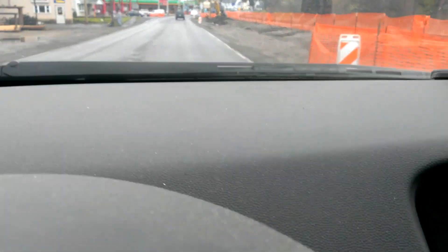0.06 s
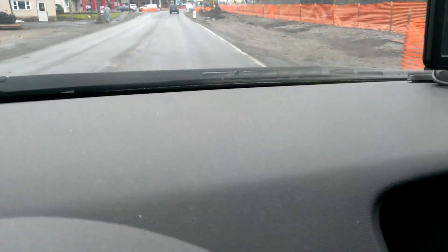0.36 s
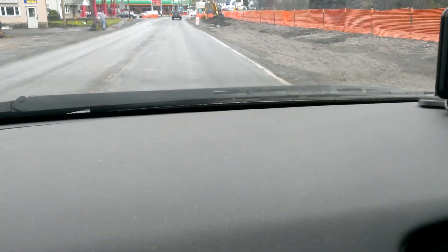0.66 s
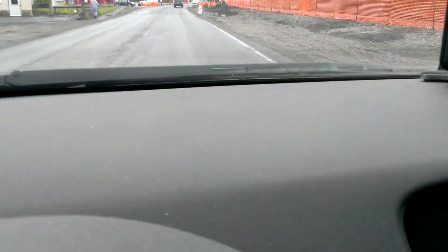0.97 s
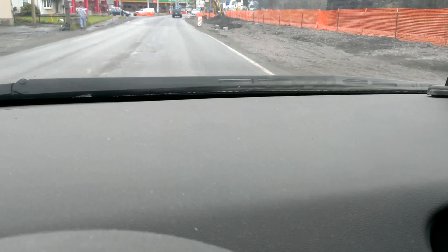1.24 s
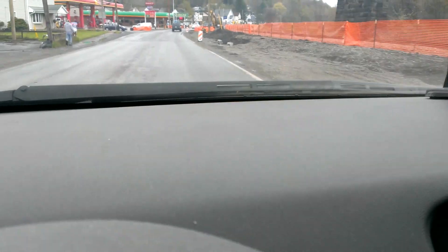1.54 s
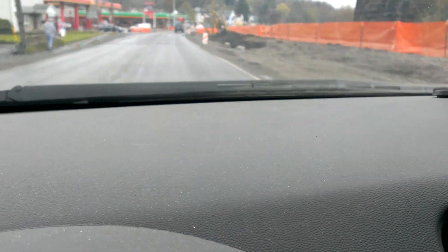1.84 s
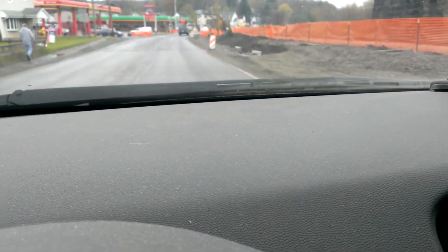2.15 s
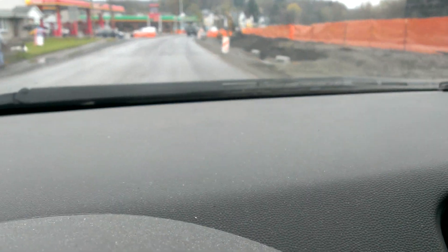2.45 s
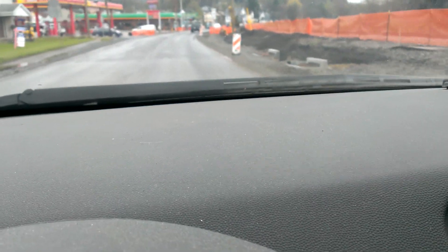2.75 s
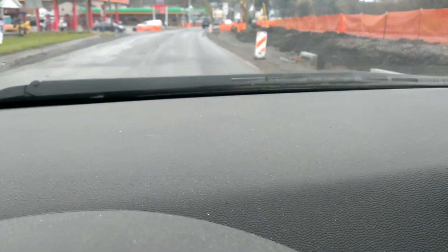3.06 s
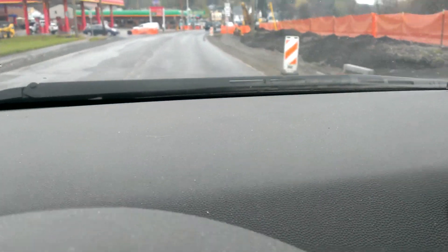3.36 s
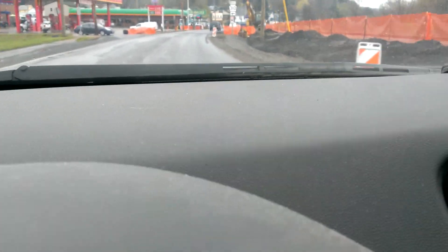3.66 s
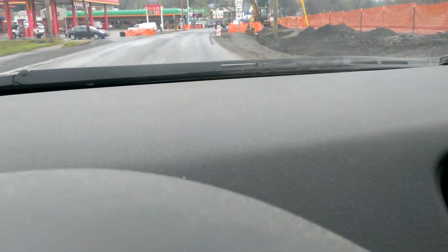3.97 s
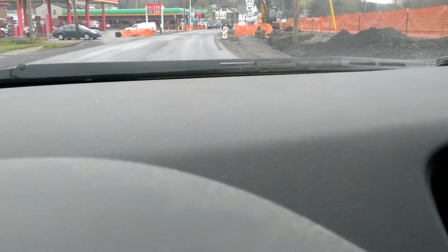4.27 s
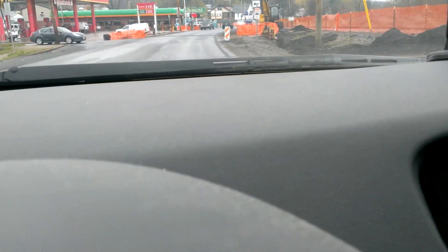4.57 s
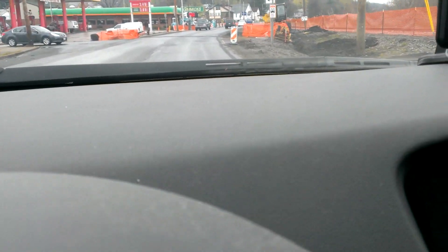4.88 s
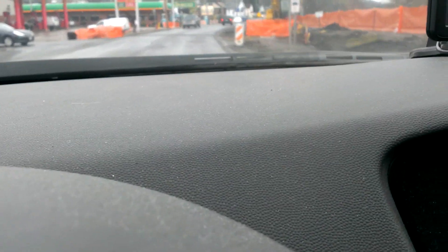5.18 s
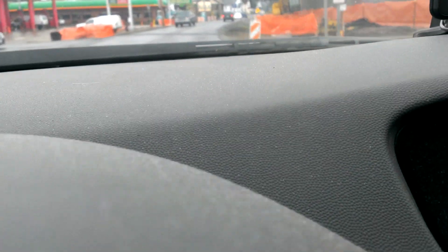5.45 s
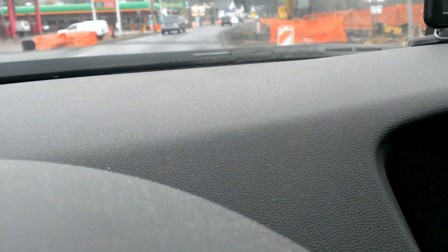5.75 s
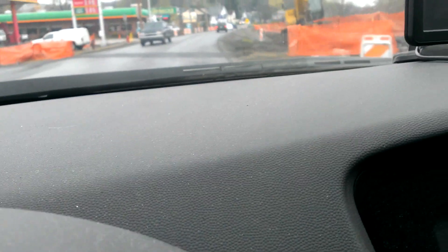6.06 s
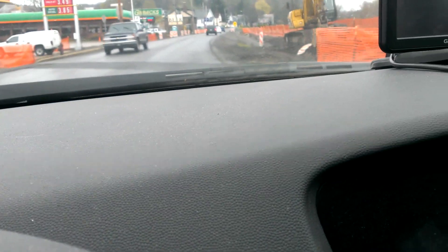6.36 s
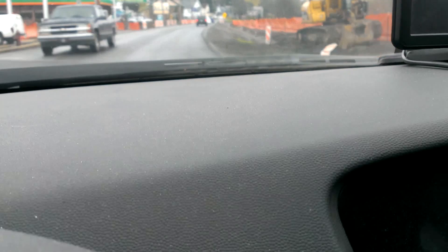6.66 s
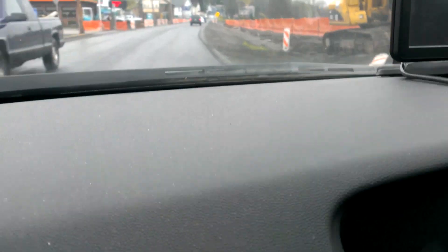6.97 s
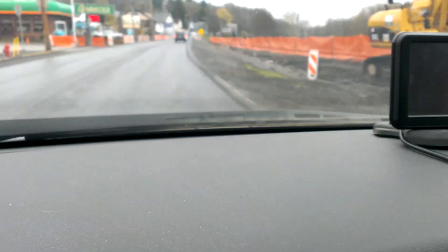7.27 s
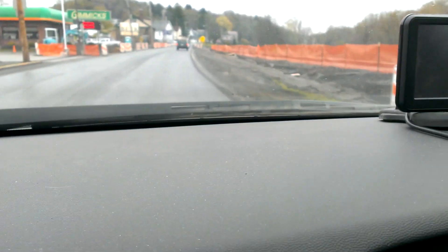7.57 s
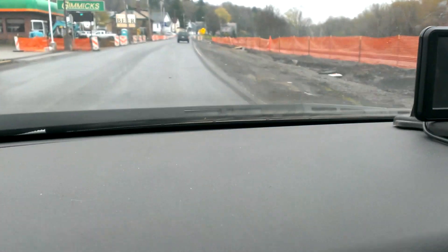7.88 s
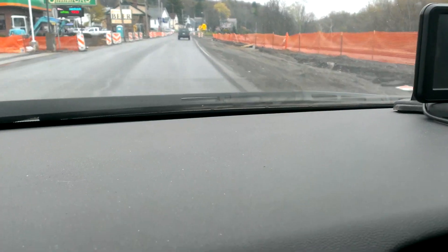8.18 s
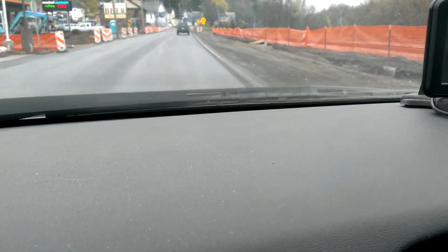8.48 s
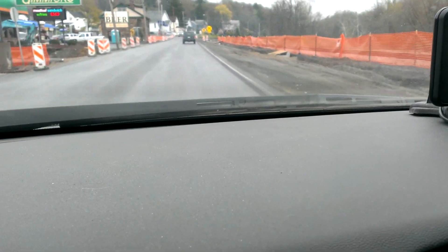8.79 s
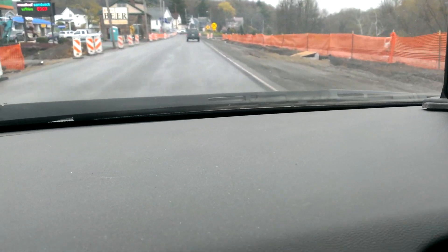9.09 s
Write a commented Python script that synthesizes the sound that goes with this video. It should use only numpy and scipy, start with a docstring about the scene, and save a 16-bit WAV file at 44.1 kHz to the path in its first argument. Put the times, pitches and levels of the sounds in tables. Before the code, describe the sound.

Throughout, a car is heard from the front passenger seat at a steady speed: a deep body rumble, a wavering tyre drone and hum, a soft engine tone and a faint hiss from the damp road. From about 0.8 to 1.1 seconds the front wheels hit broken pavement, giving suspension knocks, a low boom and a short rattle of plastic dashboard trim. The drive continues with light tyre slaps over road seams, occasional faint ticks and soft jolts near 2.3 and 4.3 seconds. From about 7.2 to 7.8 seconds comes the loudest event: a quick cluster of hard suspension knocks, then heavy body booms and shuddering, with trim rattling and buzzing and wet grit crackling against the wheel arch. The rattles die away by about 8.2 seconds, leaving the steady rumble and tyre noise until the end, just past 9 seconds.

```python
"""Car cabin on a damp, rough road

Tyres drone through the body and hum at multiples of the wheel rate, over a soft engine tone.
Twice the front wheels hit broken pavement: the suspension knocks, the body booms and the
dashboard trim rattles. The second time, wet grit sprays into the wheel arch."""
import sys
import numpy as np
from scipy import signal
from scipy.fft import rfft, irfft, next_fast_len
from scipy.io import wavfile
from scipy.ndimage import uniform_filter1d, minimum_filter1d

SR = 44100
rng = np.random.default_rng(int(sys.argv[2]) if len(sys.argv) > 2 else 0)


def master(y):
    """Save y as 16-bit WAV."""
    cut = np.clip(np.atleast_2d(y).T, -1, 1)
    pcm = np.round(cut * 32767)  # scale
    wavfile.write(sys.argv[1], SR, pcm.astype(np.int16))


N = 411453
TIME_S = np.arange(N) / SR


def from_db(db):
    """Decibels to gain."""
    return np.exp(np.asarray(db) * (np.log(10) / 20))


def unit_rms(x):
    """Scale to unit power."""
    return x / np.sqrt(np.mean(x ** 2) + 1e-20)


def in_time(rows):
    """Each value column of a time curve, at every sample."""
    time_s, *columns = np.transpose(rows)
    return [np.interp(TIME_S, time_s, column) for column in columns]


def at_hz(points, hz):
    """Interpolate a table along log frequency."""
    known_hz, values = np.transpose(points)
    return np.interp(np.log(hz + 1e-9), np.log(known_hz), values)


def drift(rate_per_s, step=1):
    """Smooth random curve, rms 1, at every step-th sample."""
    knots = rng.standard_normal(1000)
    place = np.arange(0, N, step) * (rate_per_s / SR)
    return unit_rms(np.interp(place, np.arange(len(knots)), knots))


def add(track, start_s, sound):
    """Mix a sound into a track."""
    start = round(start_s * SR)
    track[..., start:start + sound.shape[-1]] += sound[..., :N - start]


def swell(t, rise_s):
    """Envelope that peaks at 1 after rise_s, then decays."""
    age = np.maximum(t, 0) / rise_s
    return age * np.exp(1 - age)


def swells(rows):
    """Sum of timed swells."""
    out = np.zeros(N)
    for start_s, height, rise_s in rows:
        add(out, start_s, height * swell(TIME_S[:SR // 4], rise_s))
    return out


def ramp_db(full_s, end_s, attack_db_per_s, release_db_per_s, build_db_per_s=0):
    """Attack until full_s, build to 0 dB at end_s, then release."""
    onset_db = attack_db_per_s * np.maximum(full_s - TIME_S, 0)
    below_peak_db = np.maximum(build_db_per_s * (end_s - TIME_S), release_db_per_s * (TIME_S - end_s))
    return np.maximum(-onset_db - below_peak_db, -200)


def bend(sound, ratio):
    """Shift pitch by a changing ratio."""
    place = np.cumsum(ratio) % (N - 1)
    return np.array([np.interp(place, np.arange(N), channel) for channel in sound])


# Left-right likeness: freq_hz, correlation
CORRELATION = [(60, .995), (110, .99), (135, .975), (280, .955), (550, .92), (1000, .68), (2000, .36),
               (4000, .66), (6000, .55), (9000, .85)]


def widen(mid, side, hz):
    """Left and right spectra: alike in the bass, more diffuse in the treble."""
    alike = np.clip(at_hz(CORRELATION, hz), 0, 1)
    return np.sqrt(1 + alike) * mid + np.sqrt(1 - alike) * side * [[1], [-1]]


# Stereo balance: freq_hz, left_minus_right_db
CABIN_BALANCE = [(60, -0.5), (250, 1), (600, 0), (1100, -1), (1900, -6.5), (3300, -4.5), (5900, -4.5),
                 (10000, 1)]
# Windscreen, side glass and roof reflections: delay_s, gain
REFLECTIONS = [(.00208, 0.05), (.0052, 0.06), (.0083, -.15), (.0127, 0.067)]


def cabin_noise(spectrum, grain_db=0, reflect=False):
    """Coloured stereo noise, rms 1; grain_db makes it a stream of unequal impacts."""
    size = next_fast_len(N, real=True)
    top_hz = min(2 * spectrum[-1][0], SR / 2)
    hz = np.arange(int(top_hz * size / SR)) * SR / size
    if grain_db:
        noise = rng.standard_normal((2, size))
        white = rfft(noise * from_db(grain_db * np.minimum(rng.exponential(1, size), 6)))
    else:
        noise = rng.standard_normal((2, size), dtype=np.float32)
        white = noise[:, :size // 2 * 2].view(np.complex64)
    pan_db = at_hz(CABIN_BALANCE, hz) * [[.5], [-.5]]
    gain = from_db(at_hz(spectrum + [(top_hz + 1, -80)], hz) + pan_db)
    if reflect:
        echoes = sum(echo * np.exp(-2j * np.pi * hz * delay_s) for delay_s, echo in REFLECTIONS)
        gain = gain * np.abs(1 + echoes)
    shaped = widen(*white[:, :len(hz)], hz) * gain
    return unit_rms(irfft(shaped.astype(np.complex64), size)[:, :N])


def strike(blows, modes, detune, vary_db=2, damping=1):
    """Each blow rings all modes with random strength and detuning; damping narrows the envelope."""
    t, out = TIME_S[:SR // 4], np.zeros(N)
    hz, mode_db, rise_s = np.transpose(modes)[..., None]
    for start_s, db, tilt_db_per_oct, pitch_ratio, length_ratio in blows:
        force, load = rng.standard_normal((2, len(modes), 1))
        gain = from_db(db + mode_db + vary_db * force + tilt_db_per_oct * np.log2(hz / hz[0]))
        envelope = swell(t, rise_s * length_ratio) ** damping
        tones = np.sin(2 * np.pi * hz * pitch_ratio * (1 + detune * load) * t)
        add(out, start_s, np.sum(gain * envelope * tones, axis=0))
    return out


# Microphone hiss: time_s, level_db
MIC_HISS_CURVE = [(0.1, -63), (0.2, -67.5), (0.7, -65.5), (2.1, -67), (3.0, -62), (4.0, -65.5), (5.7, -67),
                  (9.33, -62.5)]


def mic_hiss(texture):
    """Faint white microphone hiss, wavering slightly."""
    hiss_db = in_time(MIC_HISS_CURVE)[0] + 1.2 * texture + 1.2 * drift(14)
    return from_db(hiss_db) * rng.standard_normal(N)


# Engine tone: time_s, firing_hz, level_db
ENGINE_CURVE = [(0, 86.7, -28.5), (1.2, 87.5, -33.5), (2.2, 95.4, -36), (2.9, 97.54, -31.5), (3.6, 95, -35),
                (4.5, 86.18, -35), (5.8, 87.4, -27.5), (6.4, 87.44, -55.5), (9.33, 82, -42)]


def engine():
    """Soft firing tone that rises a little under load."""
    firing_hz, db = in_time(ENGINE_CURVE)
    phase = 2 * np.pi * np.cumsum(firing_hz) / SR + 0.49 * drift(4.4)
    return np.sqrt(2) * from_db(db) * np.sin(phase)


# Road roughness: time_s, level_db
RUMBLE_CURVE = [(0.0, -25.5), (0.4, -24.5), (3.6, -27), (3.9, -28.5), (4.1, -22.5), (4.6, -25.5),
                (5.7, -25.5), (6.5, -27.5), (7.3, -23), (8.0, -26), (8.7, -27.5), (9.33, -25)]
# Body rumble: freq_hz, density_db
RUMBLE_SPECTRUM = [(15, -31), (30, -24), (42, -6.5), (50, -3), (70, -5), (90, -7), (112, -13.5),
                   (128, -5.5), (150, -13), (200, -10), (232, -17.5), (300, -42.5)]


def road_rumble():
    """The rough surface shakes the body."""
    return from_db(in_time(RUMBLE_CURVE)[0] + 0.62 * drift(9.1)) * cabin_noise(RUMBLE_SPECTRUM)


# Tyre cavity drone: time_s, level_db
CAVITY_CURVE = [(0.0, -30), (0.2, -36.5), (0.4, -30), (0.8, -41), (2.1, -30), (2.3, -36), (2.7, -33),
                (3.5, -30), (4.3, -33.5), (4.9, -31.5), (5.1, -33), (7.0, -30), (8.1, -40), (8.3, -31.5),
                (8.8, -35.5), (9.0, -34), (9.33, -32.5)]
# Tyre cavity resonance: freq_hz, density_db
CAVITY_SPECTRUM = [(200, -32), (240, -10), (262, -9.5), (277, 1), (300, -5.5), (340, -9.5), (370, -15.5),
                   (397, -10.5), (440, -24.5), (600, -39)]


def tyre_drone():
    """The road rings the air inside the tyres."""
    return from_db(in_time(CAVITY_CURVE)[0] + 1.38 * drift(14)) * cabin_noise(CAVITY_SPECTRUM)


# Road seams: start_s, roar_boost_db, rise_s
ROAD_SEAMS = [(.375, 6.5, 0.003), (.47, 9.5, 0.016), (1.409, 8, 0.003), (3.423, 9.5, 0.0037),
              (3.835, 6.5, 0.017), (3.935, 1, 0.017), (4.375, 2, 0.02), (4.928, 0, 0.0018),
              (5.085, 7.5, 0.0091), (6.01, 5.5, 0.035), (6.19, 3, 0.01), (6.46, 4.5, 0.013),
              (6.84, 5, 0.015), (7.239, 13, 0.006)]


def seam_slap_db():
    """Brief level boosts as the tread slaps over seams."""
    return swells(ROAD_SEAMS)


# Road wetness: time_s, level_db
WET_CURVE = [(0.0, -49), (0.2, -63), (0.4, -57.5), (3.5, -54), (3.8, -53), (5.0, -58), (5.2, -55),
             (7.9, -54.5), (9.33, -54.5)]
# Wet hiss: freq_hz, density_db
WET_SPECTRUM = [(1000, -27), (1500, 3), (1900, 0.5), (2450, -2.5), (2850, -1.5), (3300, -8.5),
                (4000, -12.5), (5000, -26), (8000, -23)]
# Singing band: time_s, centre_hz, level_db
SINGING_CURVE = [(0, 2840, -73), (2.4, 2880, -71), (3.35, 2970, -69), (3.7, 2973, -59.5), (4.3, 2794, -64),
                 (4.9, 2840, -66), (5.3, 2803, -64), (6.1, 2743, -63), (6.33, 2402, -68),
                 (6.55, 2074, -59.5), (7, 1980, -60), (8.3, 2012, -66.5), (9.33, 2000, -61)]
# Singing band before the pitch shift: freq_hz, density_db
SINGING_SPECTRUM = [(2200, -26), (2750, -7), (3000, 0), (3220, -7), (3800, -26)]


def wet_hiss(texture, slap_db):
    """Damp road hisses under the tread; a narrow band sings within it and shifts in pitch."""
    hiss_db = in_time(WET_CURVE)[0] + 1.2 * texture + 1.8 * drift(60) + 0.18 * slap_db
    hiss = from_db(hiss_db) * cabin_noise(WET_SPECTRUM, grain_db=3.5, reflect=True)
    centre_hz, singing_db = in_time(SINGING_CURVE)
    peak_hz = SINGING_SPECTRUM[2][0]
    band = bend(cabin_noise(SINGING_SPECTRUM), centre_hz / peak_hz)
    return hiss + from_db(singing_db + 2.3 * drift(22)) * band


# Wheel speed: time_s, turns_per_s
WHEEL_RATE = [(0, 13.22), (1.6, 13.55), (2.6, 13.78), (3.9, 14.2), (4.7, 14.37), (5.6, 14.48), (6.8, 14.47),
              (8.2, 13.8), (9.33, 13.55)]


def wheel_turns(step=1):
    """Running count of wheel turns, at every step-th sample."""
    return np.cumsum(in_time(WHEEL_RATE)[0][::step]) * step / SR


# Asphalt coarseness: time_s, level_db
ROAR_CURVE = [(0.0, -44.5), (3.3, -44), (3.6, -41.5), (4.6, -42.5), (5.6, -41), (6.5, -42), (7.1, -44),
              (8.8, -46), (9.33, -42)]
# Tread roar: freq_hz, density_db
ROAR_SPECTRUM = [(330, -28.5), (450, 0.5), (560, 0), (660, -3.5), (790, -3.5), (970, -6), (1080, -8),
                 (1170, -9.5), (1450, -16), (2200, -35.5)]
# Groove resonance: freq_hz, density_db
GROOVE_SPECTRUM = [(780, -24), (905, -5), (985, 0), (1040, -3), (1095, -13), (1200, -30)]


def tread_roar(texture, slap_db):
    """Tread roars on asphalt, throbbing once a turn; its grooves ring in a fluttering band."""
    throb_db = 1.14 * np.cos(2 * np.pi * wheel_turns())
    roar_db = in_time(ROAR_CURVE)[0] + 1.6 * texture + throb_db + slap_db
    roar = from_db(roar_db) * cabin_noise(ROAR_SPECTRUM, reflect=True)
    flutter_db = 3.2 * np.minimum(drift(42), 1) + 1.2 * drift(8)
    grooves = bend(cabin_noise(GROOVE_SPECTRUM), 1 + .035 * drift(8))
    return roar + from_db(roar_db - 6 + flutter_db) * grooves


# Wheel-rate harmonics: order, level_db
HUM_ORDERS = [(4, -37), (9, -45), (10, -42.5), (11, -42.5), (12, -40.5), (13, -40.5), (14, -40.5),
              (19, -43), (20, -42.5), (21, -45), (22, -45.5)]
# Swells of single harmonics: centre_s, half_width_s, order, boost_db
ORDER_SWELLS = [(0, .3, 10, 11), (.42, .2, 21, 13), (1.65, .45, 10, 13), (1.7, .4, 9, 7), (2.7, .4, 13, 12),
                (2.9, .3, 21, 8), (2.95, .45, 20, 13), (3.0, .75, 10, 15), (3.35, .5, 9, 8),
                (3.9, .5, 13, 9), (4.0, .25, 12, 8), (4.7, .35, 12, 11), (4.9, .33, 19, 11),
                (5.4, .6, 9, 11), (5.4, .5, 11, 7), (5.6, .55, 14, 9), (5.9, .3, 19, 8), (6.0, .6, 13, 7),
                (6.4, .35, 12, 10), (6.5, .5, 11, 6), (6.65, .22, 19, 12), (6.68, .22, 14, 15),
                (7.9, .3, 4, 11), (8.0, .35, 13, 8), (8.3, .35, 10, 14), (8.6, .45, 19, 8),
                (8.7, .3, 12, 7), (8.8, .25, 13, 11)]


def tyre_hum(wobble_turns=.009, spread_rad=.16):
    """Tyre unevenness repeats every turn, giving harmonics that swell and fade."""
    step = 20
    t, hum = TIME_S[::step], 0
    turns = wheel_turns(step) + wobble_turns * drift(5, step)
    for order, db in HUM_ORDERS:
        offset_cycles, skew = rng.uniform(-1.036, 1, 2)
        lift_db = sum(boost_db * np.exp(-((t - centre_s) / half_width_s) ** 2)
                      for centre_s, half_width_s, boosted, boost_db in ORDER_SWELLS if boosted == order)
        phase = 2 * np.pi * (order * turns + offset_cycles) + spread_rad * skew * np.array([[1], [-1]])
        hum = hum + np.sqrt(2) * from_db(db + lift_db + 2.1 * drift(7, step)) * np.sin(phase)
    return signal.resample_poly(hum, step, 1, axis=1, window=("kaiser", 10))[:, :N]


# Dashboard resonances: freq_hz, width_hz, gain_db
PANEL_MODES = [(2250, 580, 8.5), (3500, 140, -1.5), (4600, 260, 0.5), (8950, 440, -2)]


def chatter(db, ring_hz, width_oct, rise_s, pan_db=-3, size=4096):
    """One burst of uneven plastic contacts, coloured by the part and the dashboard."""
    hz = np.arange(1, size // 2 + 2) * SR / size
    panel = 1 + sum(from_db(mode_db) / (1 + (2 * (hz - mode_hz) / width_hz) ** 2)
                    for mode_hz, width_hz, mode_db in PANEL_MODES)
    resonance = panel / (1 + (np.log2(hz / ring_hz) / width_oct) ** 2)
    strengths = from_db(1.5 * rng.standard_normal(size // 20))
    contacts = np.repeat(strengths, SR // 1000)[:size] * rng.standard_normal((2, size))
    buzz = unit_rms(irfft(widen(*rfft(contacts), hz) * resonance, size))
    return buzz * swell(TIME_S[:size], rise_s) * from_db(db + pan_db * np.array([[.5], [-.5]]))


# Soft rustles: start_s, level_db, centre_hz, width_oct
CABIN_RUSTLES = [(1.18, -56.5, 4200, 1), (1.24, -58, 2500, 0.71), (2.74, -57, 3570, 0.21),
                 (3.001, -63, 4400, 0.33), (3.05, -58, 5760, .07), (3.09, -53.5, 3120, 0.12),
                 (3.63, -56.5, 5130, 1), (4.369, -57, 2850, .1)]


def rustles():
    """Soft, slow-rising rustles in the cabin."""
    out = np.zeros((2, N))
    for start_s, db, centre_hz, width_oct in CABIN_RUSTLES:
        add(out, start_s, chatter(db, centre_hz, width_oct, rise_s=.033, size=16384))
    return out


# Plastic ticks, plus a sharp scuff of grit in the spray: start_s, level_db, ring_hz, left_minus_right_db,
# width_oct
PLASTIC_TICKS = [(.010, -54.5, 9100, 0, .04), (0.776, -45.5, 4670, -2, .07), (.777, -48, 2400, 2, 0.22),
                 (0.904, -33, 846, -3, 0.16), (0.971, -28.5, 1050, 0, 0.18), (1.015, -40, 2250, -9, .2),
                 (1.606, -52, 3800, 9, 0.28), (2.353, -50, 9700, -2, .2), (4.142, -48.5, 3800, 7, 0.35),
                 (7.382, -41, 4470, -3, 0.18), (7.452, -27, 895, -1, .2), (7.749, -36, 4300, -2, 0.27),
                 (8.195, -47, 8700, -3, .35), (8.214, -43, 8100, -5, .33), (9.243, -44.5, 4830, -7, .15),
                 (9.243, -46, 2530, -7, .15)]


def plastic_ticks(rise_s=.0024, stray_per_s=2, stray_db=-67, low_hz=2500, high_hz=4500):
    """Plastic parts tick sharply, grit scuffs once, and faint strays tick at random times."""
    out = np.zeros((2, N))
    for start_s, db, ring_hz, pan_db, width_oct in PLASTIC_TICKS:
        add(out, start_s, chatter(db, ring_hz, width_oct, rise_s, pan_db))
    for when, pitch in rng.random((round(stray_per_s * N / SR), 2)):
        ring_hz = low_hz * (high_hz / low_hz) ** pitch
        add(out, when * TIME_S[-1], chatter(stray_db, ring_hz, width_oct=.35, rise_s=rise_s))
    return out


# Loose part modes: ring_hz, level_db, loss_per_bounce_db
PART_MODES = [(3470, -54, 1.3), (8930, -62, 2.2)]


def bouncing_part(start_s=1.169, interval_s=.057, jitter_s=.004, bounces=5):
    """A loose part bounces to rest after the first broken patch."""
    out = np.zeros((2, N))
    for k, late_s in enumerate(jitter_s * rng.standard_normal(bounces)):
        for ring_hz, db, loss_db in PART_MODES:
            contact = chatter(db - k * loss_db, ring_hz, width_oct=.07, rise_s=.004)
            add(out, start_s + k * interval_s + late_s, contact)
    return out


# Trim snaps and rattles, plus a scuff of grit as the spray begins: start_s, level_db, ring_hz, rise_s
TRIM_RATTLES = [(0.776, -42.5, 3200, 0.0031), (0.785, -52, 3200, 0.0084), (0.953, -50, 4000, 0.0064),
                (.970, -45, 3000, 0.0073), (0.983, -39, 2600, 0.0054), (1.008, -50, 3200, 0.0044),
                (1.110, -45.5, 3900, 0.0088), (2.284, -48.5, 1900, .009), (2.308, -45, 5000, 0.00094),
                (2.316, -49.5, 3000, .007), (2.347, -47, 5000, 0.0093), (2.36, -42.5, 2700, 0.0021),
                (2.384, -54, 4500, .011), (4.395, -56, 3200, .007), (4.457, -54.5, 3300, .006),
                (7.222, -51, 4200, .008), (7.315, -44, 3800, 0.0041), (7.379, -46, 3900, 0.0099),
                (7.452, -51, 3600, .005), (7.504, -36, 2200, 0.0049), (7.530, -36, 3200, .003),
                (7.634, -36, 3800, 0.012), (7.742, -35, 2390, 0.0071), (7.849, -48, 3600, 0.0037),
                (7.89, -53, 4150, 0.0077), (7.952, -47, 3640, .0052), (8.107, -57, 4200, .006)]


def trim_rattles():
    """Loose trim chatters in broad bursts, each part around its own pitch; a grit scuff chatters the same way."""
    out = np.zeros((2, N))
    for start_s, db, ring_hz, rise_s in TRIM_RATTLES:
        add(out, start_s, chatter(db, ring_hz, width_oct=.82, rise_s=rise_s))
    return out


# Grit bursts: full_s, end_s, end_level_db, swing_per_turn_db
GRIT_BURSTS = [(7.221, 7.488, -43.5, 5.5), (7.51, 7.75, -31, -1.5)]
# Grit on the wheel arch: freq_hz, density_db
GRIT_SPECTRUM = [(350, -17), (600, -6.5), (1040, -4.5), (1170, -5.5), (1520, -12.5), (2130, -8.5),
                 (2600, -13), (3860, -15), (5460, -22.5), (6300, -25), (7810, -33), (9010, -29.5),
                 (10400, -35), (13500, -64), (22000, -120)]


def grit_spray(gust_s=7.63, stones_per_s=70, stone_range_db=6, stone_rise_s=.0005):
    """Wet grit pelts the arch, first in a gust per wheel turn, then as a stream; stones crackle."""
    turns_per_s = np.interp(gust_s, *np.transpose(WHEEL_RATE))
    gusts = np.cos(2 * np.pi * turns_per_s * (TIME_S - gust_s))
    flow = 0
    for full_s, end_s, db, swing_db in GRIT_BURSTS:
        shape_db = ramp_db(full_s, end_s, attack_db_per_s=299, release_db_per_s=160, build_db_per_s=14.5)
        flow = flow + from_db(db + swing_db * gusts + shape_db)
    first_s = GRIT_BURSTS[0][0]
    span_s = GRIT_BURSTS[-1][1] - first_s
    stones = swells([(first_s + when * span_s, from_db(-stone_range_db * smallness), stone_rise_s)
                     for when, smallness in rng.random((round(stones_per_s * span_s), 2))])
    level = flow * (1 + stones) * from_db(1.2 * drift(70))
    return level * cabin_noise(GRIT_SPECTRUM, grain_db=2.5, reflect=True)


# Broken pavement: enter_s, leave_s, leave_level_db
BROKEN_PATCHES = [(.78, 1.02, -26), (7.306, 7.719, -13)]
# Body shudder: freq_hz, density_db
SHUDDER_SPECTRUM = [(15, -23), (30, -15.5), (45, 5), (110, -0.5), (190, -0.5), (260, -18), (420, -14.5),
                    (560, -30), (800, -22), (1050, -29.5), (1500, -58)]


def shudder():
    """The car shudders harder across each broken patch and settles after it."""
    level = 0
    for enter_s, leave_s, db in BROKEN_PATCHES:
        shape_db = ramp_db(enter_s, leave_s, attack_db_per_s=158, release_db_per_s=98, build_db_per_s=8)
        level = level + from_db(db + shape_db)
    return level * cabin_noise(SHUDDER_SPECTRUM)


# Trim buzz: freq_hz, density_db
BUZZ_SPECTRUM = [(1200, -17.5), (2200, -1.5), (3600, 4), (6000, -12.5), (9000, -3), (11000, -10)]


def trim_buzz(offset_db=-48, patch_db_ratio=0.46):
    """The drop off each patch sets the trim buzzing; it settles slowly."""
    level = 0
    for _, leave_s, db in BROKEN_PATCHES:
        shape_db = ramp_db(leave_s, leave_s, attack_db_per_s=158, release_db_per_s=34)
        level = level + from_db(offset_db + patch_db_ratio * db + shape_db)
    return level * from_db(2.9 * drift(56)) * cabin_noise(BUZZ_SPECTRUM)


# Heavy jolts: start_s, level_db, tilt_db_per_oct
BODY_JOLTS = [(0.743, -15.5, 1.5), (0.755, -10.5, 1), (0.921, -7, -2), (0.936, -11.5, -1),
              (0.955, -8.5, -5), (1.075, -17.5, -3), (2.29, -16, -7), (4.338, -16, -8), (7.333, -21, 6.5),
              (7.415, -25, 15.5), (7.512, -7, 4), (7.574, -3.5, 0.5), (7.628, -1.5, -12), (7.678, -10, 3),
              (7.721, -7.5, -2), (7.765, -16, 6.5), (7.837, -23, -3)]
# Shell and cabin air modes: freq_hz, gain_db, rise_s
BODY_MODES = [(46.8, -9.5, 0.039), (59.6, -0.5, 0.022), (74.8, -1.5, 0.018), (102.8, -3, 0.011),
              (173, -16, 0.012)]


def body_booms():
    """Heavy jolts ring the body shell and the cabin air."""
    return strike([(*jolt, 1, 1) for jolt in BODY_JOLTS], BODY_MODES, detune=0.032)


# Hard knocks: start_s, level_db, tilt_db_per_oct, pitch_ratio, length_ratio
STRUT_KNOCKS = [(.783, -17, -9, 0.93, 0.93), (.850, -9.5, -2, 0.97, 1.16), (.868, -9.5, -7, 0.93, 1.04),
                (0.893, -11, -7, 0.87, 0.67), (4.140, -19, -3, 1.14, 1.2), (7.277, 0, -2, 0.97, 0.71),
                (7.308, -0.5, -1, 1.06, 0.73), (7.334, -10, -3, 0.84, 0.94), (7.357, 0.5, -1, 1, 1.23),
                (7.405, -4, -2.5, 1.05, 0.82), (7.436, -3.5, -1, 1, 1.15), (7.469, 1, -5.5, 1.04, 0.65),
                (7.484, -5.5, -5, 1.03, .8)]
# Strut and mount modes: freq_hz, gain_db, rise_s
STRUT_MODES = [(245.7, 0, 0.0097), (194.4, -20, 0.017), (354.5, -11, 0.0084), (429, -17.5, 0.01),
               (606, -27.5, 0.0058), (687, -21.5, 0.011), (800, -30, 0.0068), (867, -31, 0.0088)]
# Contact clack: freq_hz, density_db
CLACK_SPECTRUM = [(350, -23), (550, 10), (750, 2), (950, -6), (1300, -24.5), (2500, -36)]


def suspension_knocks(jolt_gain_db=-17, jolt_tilt_db_per_oct=-8, clack_gain_db=-19, clack_rise_s=.0027):
    """Hard knocks clack and ring the strut; body jolts ring it too, softer and duller."""
    soft_knocks = [(start_s, db + jolt_gain_db, jolt_tilt_db_per_oct, 1, 1)
                   for start_s, db, _ in BODY_JOLTS]
    rings = strike(STRUT_KNOCKS + soft_knocks, STRUT_MODES, detune=0.023, damping=2)
    clack_oct = np.log2(CLACK_SPECTRUM[2][0] / STRUT_MODES[0][0])  # above the main strut mode
    clacks = swells([(start_s, from_db(db + clack_gain_db + tilt_db_per_oct * clack_oct), clack_rise_s)
                     for start_s, db, tilt_db_per_oct, _, _ in STRUT_KNOCKS])
    return rings + clacks * cabin_noise(CLACK_SPECTRUM)


def scene():
    """All sources at the front passenger seat, with 3 ms fades."""
    texture = drift(24)  # coarse and fine asphalt passing under the tread
    slap_db = seam_slap_db()
    background = mic_hiss(texture) + engine() + road_rumble()
    tyres = tyre_drone() + wet_hiss(texture, slap_db) + tread_roar(texture, slap_db) + tyre_hum()
    interior = rustles() + plastic_ticks() + bouncing_part() + trim_rattles()
    bumps = grit_spray() + shudder() + trim_buzz() + body_booms() + suspension_knocks()
    fade = np.minimum(1, np.minimum(TIME_S, TIME_S[-1] - TIME_S) / .003)
    return fade * (background + tyres + interior + bumps)


def record(dry):
    """Microphone low cut, peak limiter, steep high cut."""
    low_cut_hz, high_cut_hz = 21, 10500
    ceiling, hold_samples = .8, SR // 80
    heard = signal.sosfilt(signal.butter(2, low_cut_hz, "high", fs=SR, output="sos"), dry)
    needed_gain = np.minimum(1, ceiling / (np.abs(heard).max(axis=0) + 1e-9))
    gain = uniform_filter1d(minimum_filter1d(needed_gain, hold_samples), hold_samples)
    return signal.sosfilt(signal.ellip(12, .1, 80, high_cut_hz, fs=SR, output="sos"), heard * gain)


dry = scene()
out = record(dry)
master(out)
```